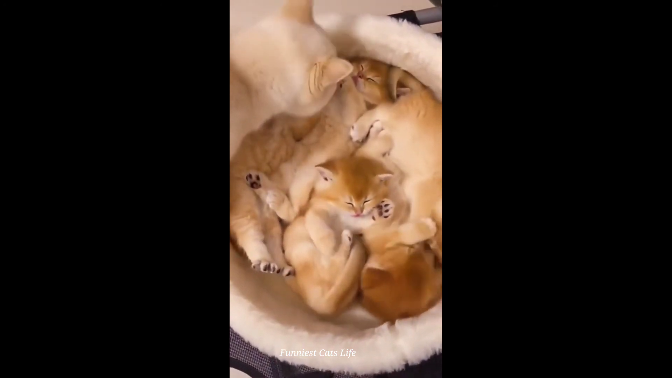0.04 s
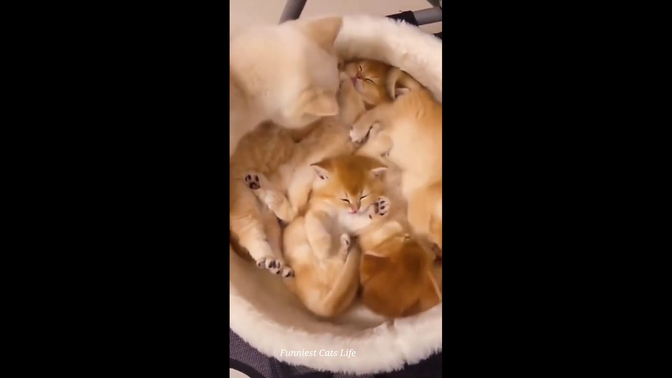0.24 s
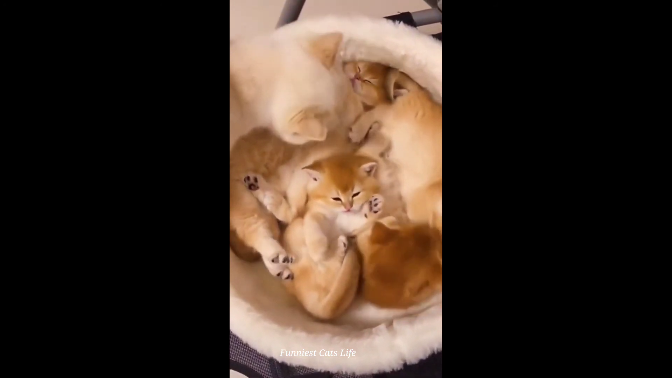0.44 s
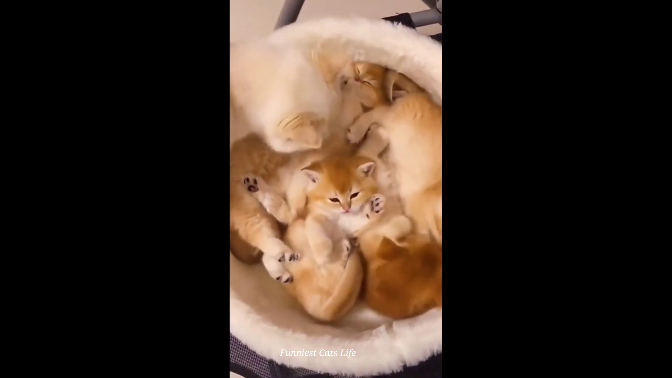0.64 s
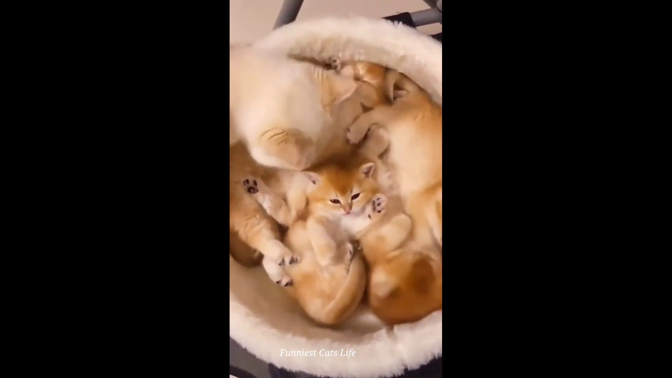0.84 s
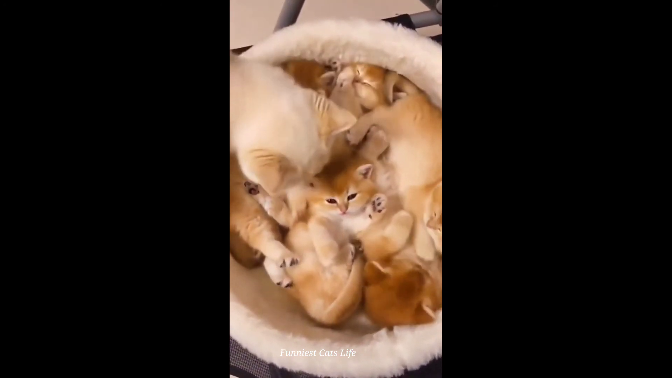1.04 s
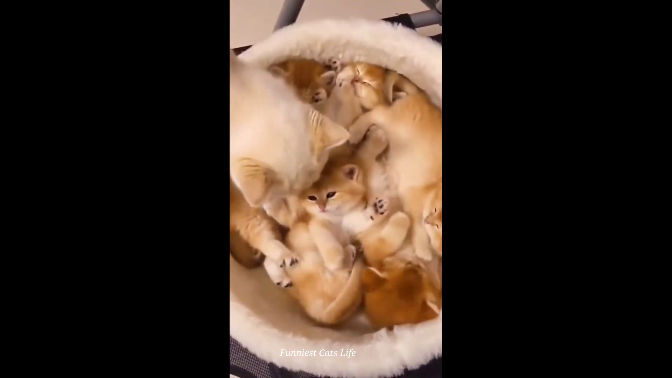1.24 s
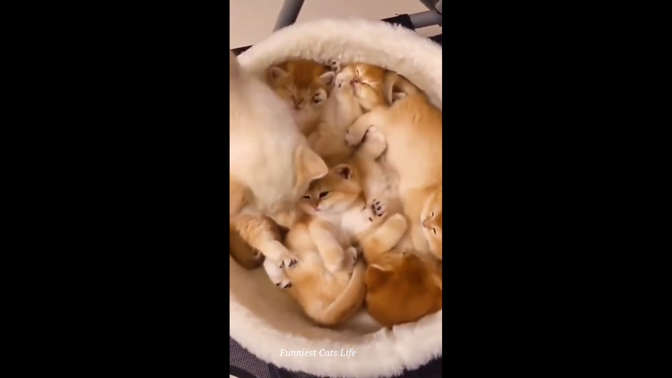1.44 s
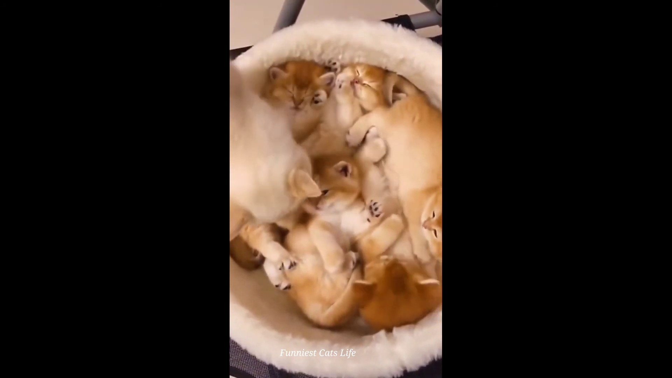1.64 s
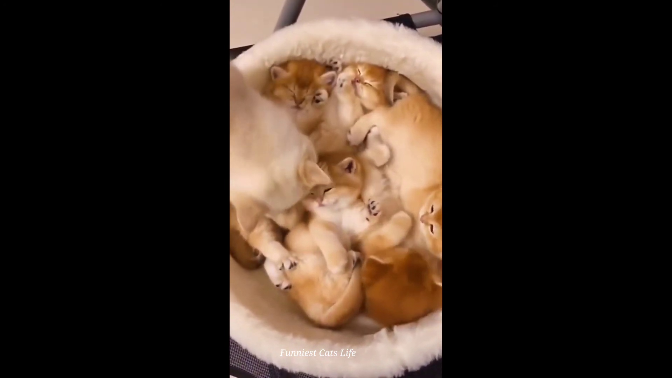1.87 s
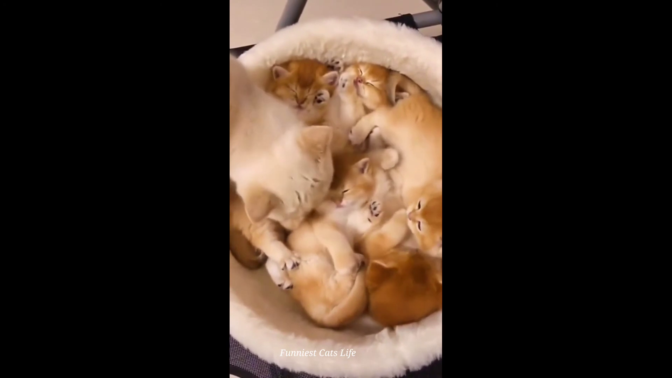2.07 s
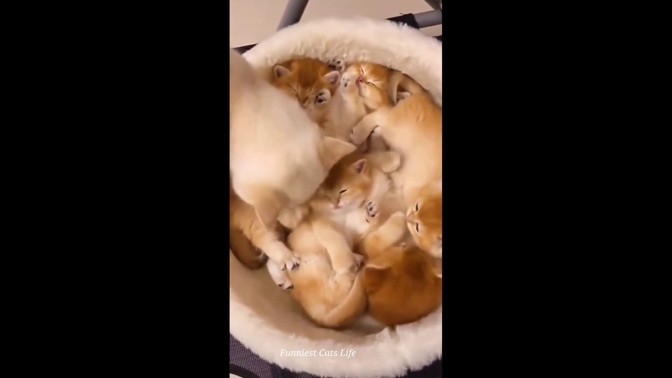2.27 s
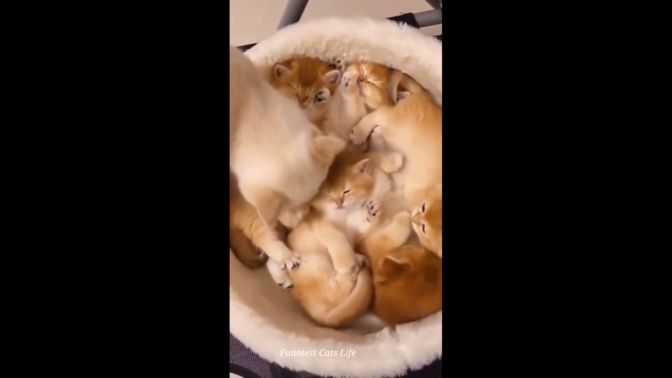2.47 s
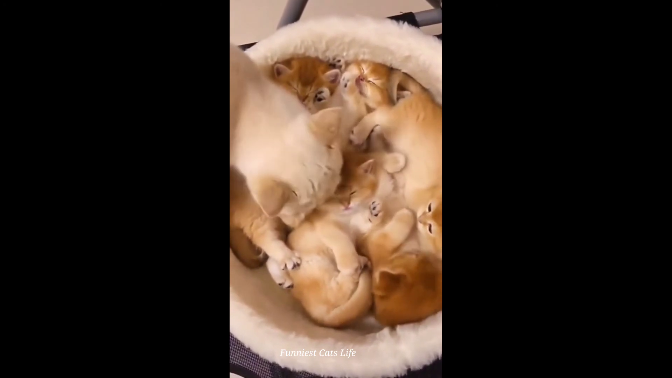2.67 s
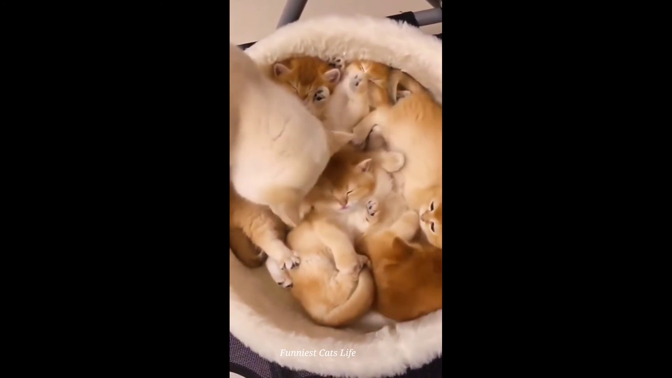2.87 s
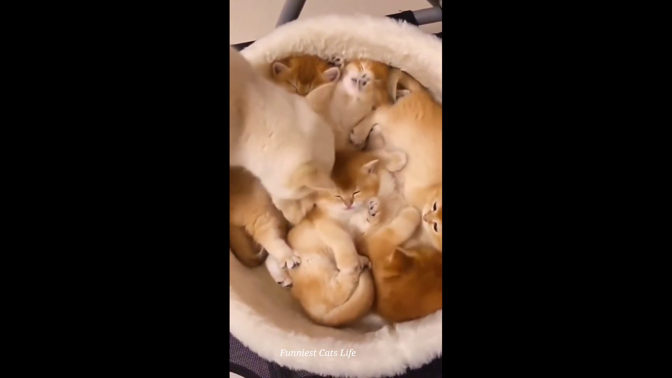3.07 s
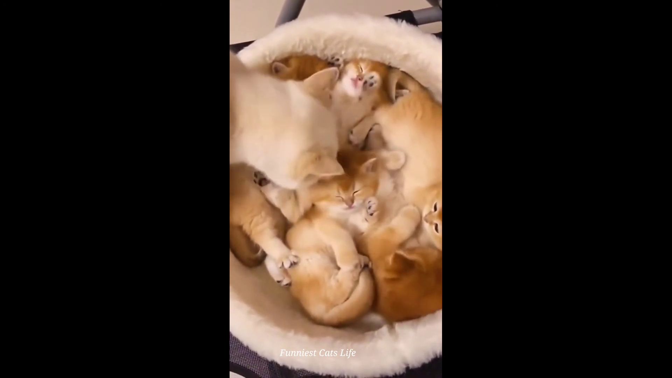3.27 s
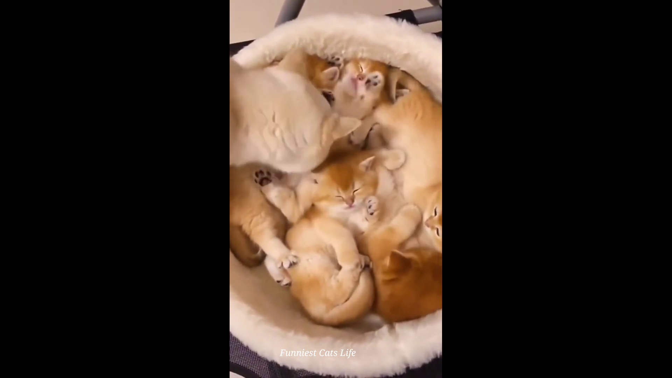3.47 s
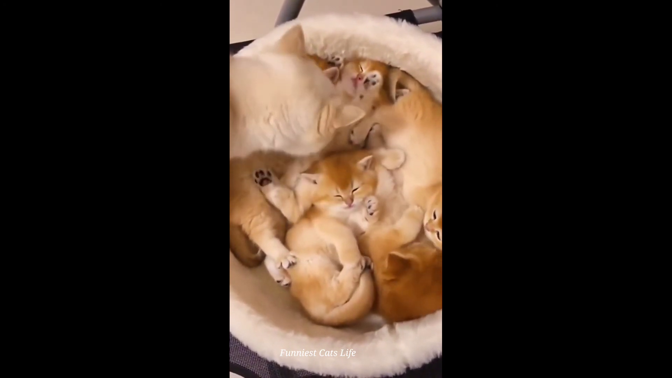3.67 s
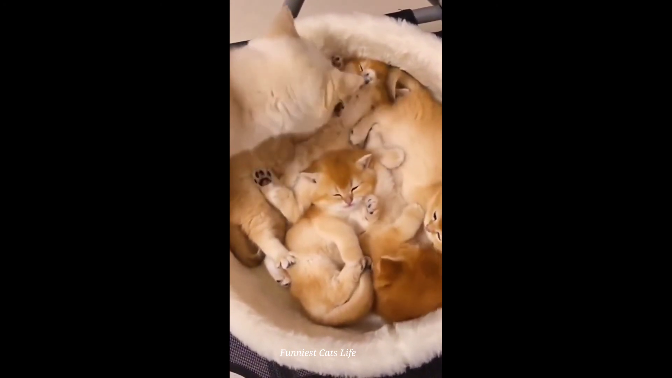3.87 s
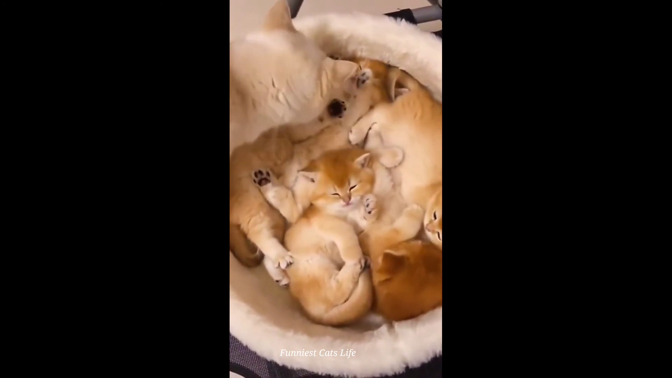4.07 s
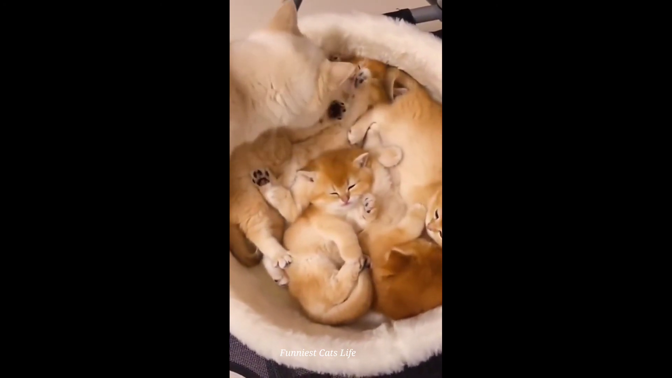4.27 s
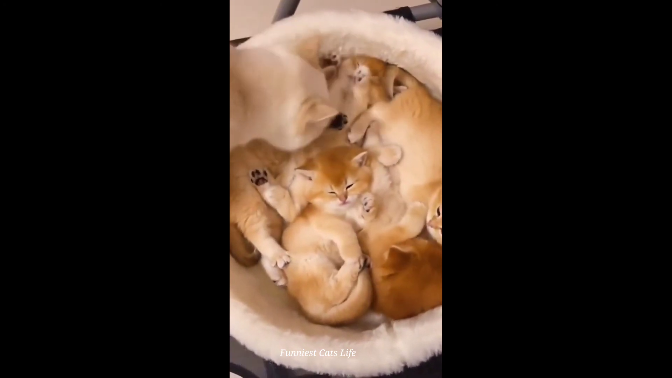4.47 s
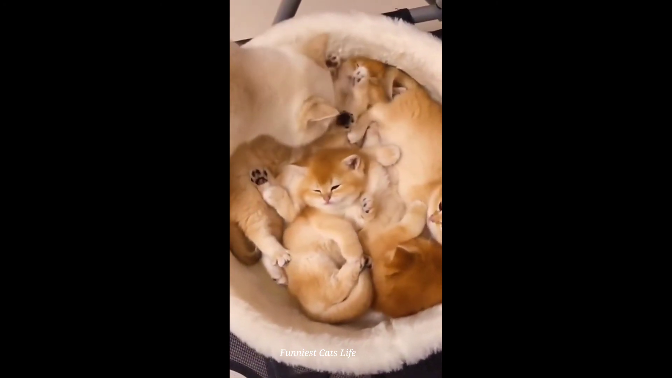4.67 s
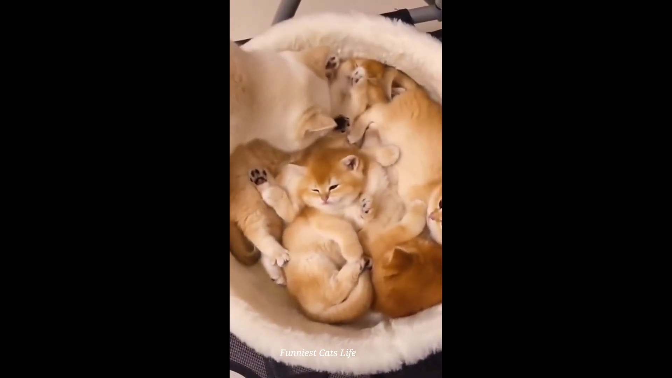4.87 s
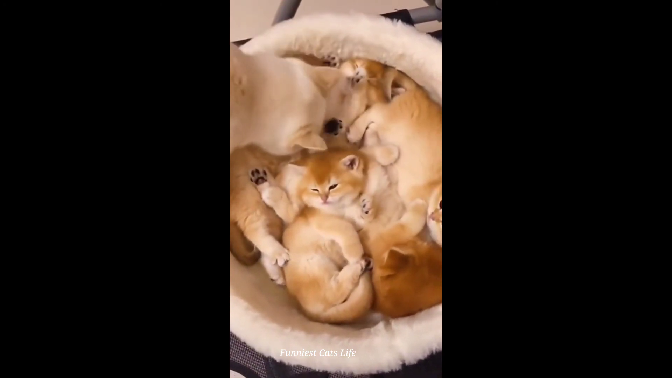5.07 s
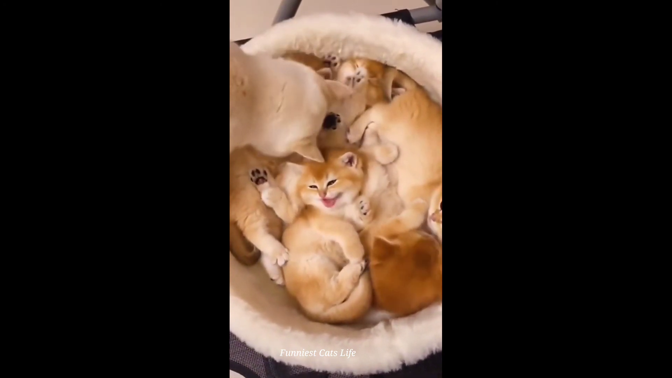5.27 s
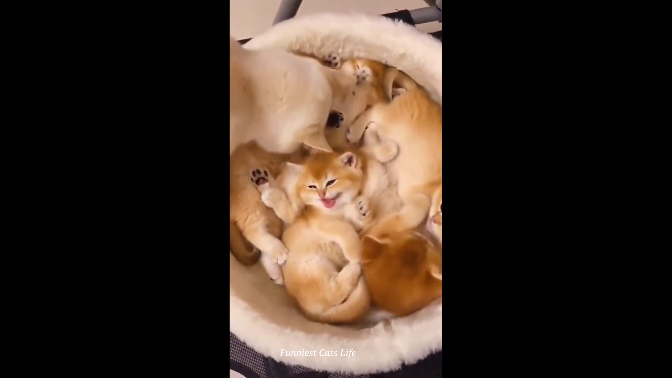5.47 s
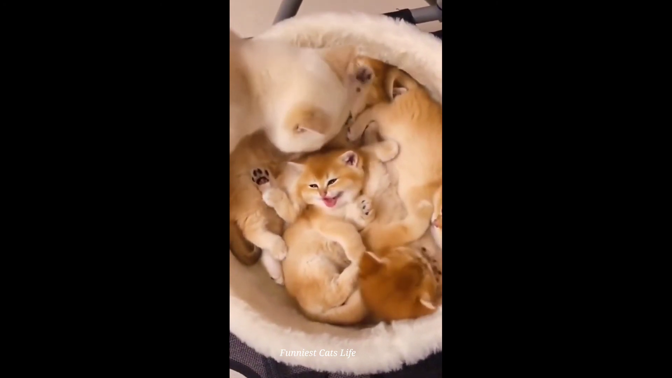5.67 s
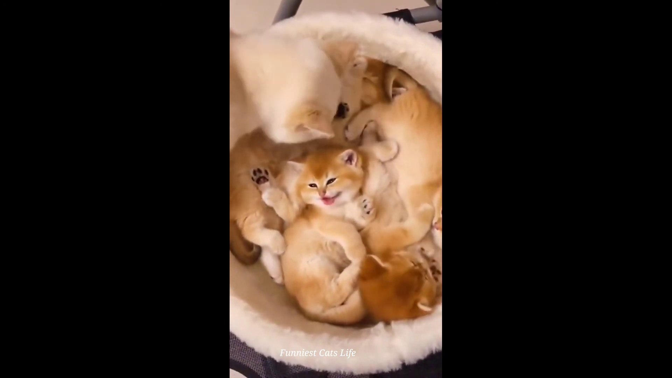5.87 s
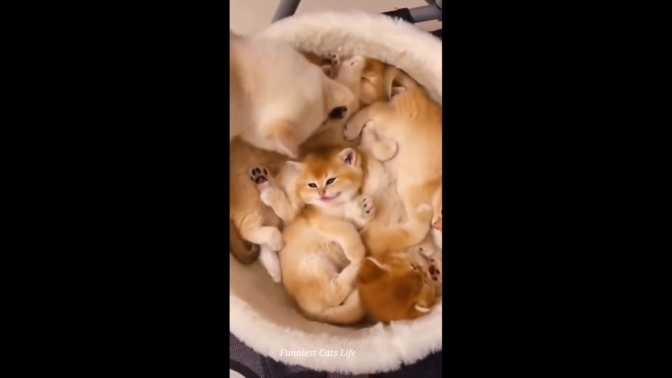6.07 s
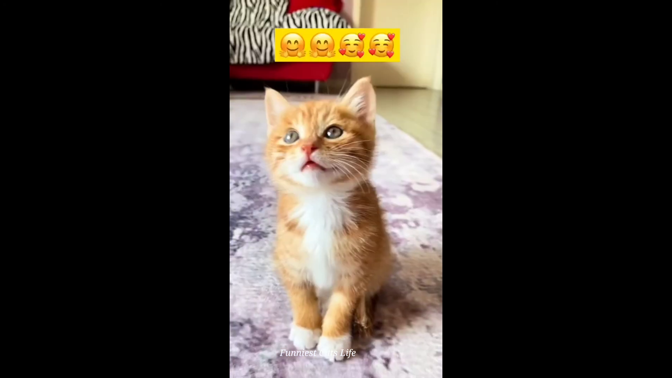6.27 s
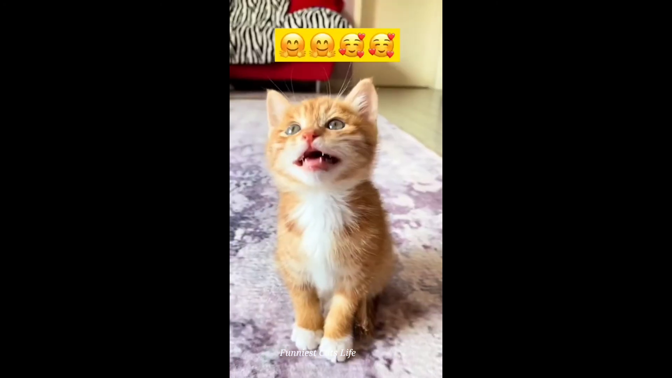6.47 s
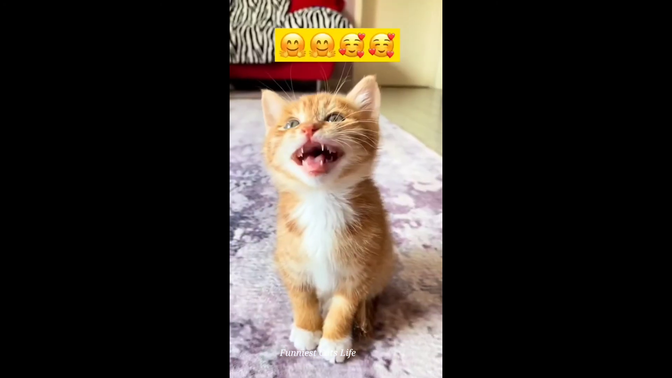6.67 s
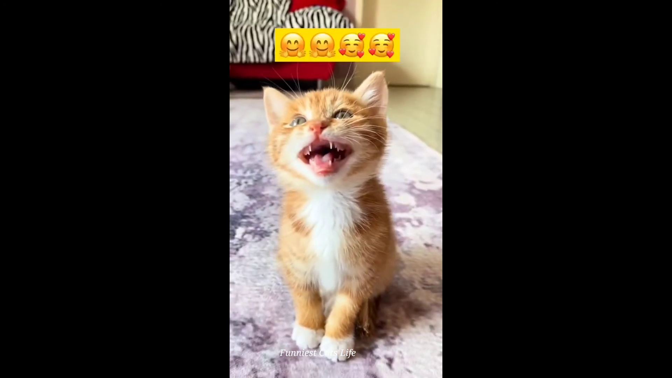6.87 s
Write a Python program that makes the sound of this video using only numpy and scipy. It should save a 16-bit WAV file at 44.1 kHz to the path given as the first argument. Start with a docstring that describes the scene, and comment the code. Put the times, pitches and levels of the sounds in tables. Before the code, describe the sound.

Faint mouth ticks open the scene over low room noise, then a cat mews quietly five times in a basket of kittens. Brief licks, light rustling of bedding and a few dull bumps on the basket fall among the calls, with a little room echo. After a dip to near silence, a single kitten meows right by the microphone, much louder and higher, breathy and just distorting.

```python
"""Cat and kittens in a basket

A cat among her kittens gives five quiet mews in a furnished room, each a harmonic series filtered by
her mouth. Mouths tick, pop and lick, the soft basket rings to dull taps and fur rustles the bedding.
The sound fades to near silence, then fades in on one kitten close by, whose long, loud, breathy meow
just overloads the input."""
import sys
import numpy as np
from scipy import signal
from scipy.fft import rfft, irfft, next_fast_len
from scipy.io import wavfile

SR = 44100
rng = np.random.default_rng(int(sys.argv[2]) if len(sys.argv) > 2 else 0)


def waveform_to_disk(signal):
    """Save audio, clipped to [-1, 1], as 16-bit WAV at the path in sys.argv[1]."""
    frames = np.transpose(np.atleast_2d(signal))
    scaled = np.clip(frames, -1, 1) * 32767
    samples = np.round(scaled).astype(np.int16)
    wavfile.write(sys.argv[1], SR, samples)


N = 305611


def amp(db):
    """Amplitude ratio: a factor of ten for every 20 dB."""
    return 10 ** (np.asarray(db) / 20)


def rms_one(x):
    """Normalisation to unit mean power."""
    return x / np.sqrt(np.mean(x ** 2) + 1e-20)


def span(rows):
    """Linear interpolation in time: the samples a table covers, and its columns at each."""
    times, *columns = np.transpose(rows)
    at = np.arange(int(times[0] * SR), min(int(times[-1] * SR) + 1, N))
    return at, [np.interp(at / SR, times, c) for c in columns]


def at_hz(points, hz):
    """Interpolation of a spectral envelope over log frequency."""
    knots_hz, db = np.transpose(points)
    return np.interp(np.log(hz), np.log(knots_hz), db)


def blend(knots_hz, colours, shares, hz):
    """Weighted mean of spectral envelopes, in dB, at the frequencies hz."""
    return sum(share * np.interp(np.log(hz), np.log(knots_hz), c) for c, share in zip(colours, shares))


def drift(rate_hz, size):
    """Random modulation: noise through a two-pole low-pass, rms 1."""
    pole = np.exp(-2 * np.pi * rate_hz / SR)
    slow = signal.lfilter([1], [1, -2 * pole, pole * pole], rng.standard_normal(size + 4000))
    return rms_one(slow[4000:])


def coloured(spectrum, size=N):
    """Spectral shaping of white noise, band-limited to the envelope's ends; rms 1."""
    hz = np.maximum(np.arange(size // 2 + 1) * SR / size, 1)
    inside = (hz > spectrum[0][0]) & (hz < spectrum[-1][0])
    return rms_one(irfft(rfft(rng.standard_normal(size)) * amp(at_hz(spectrum, hz)) * inside, size))


def edges(size, ramp_s):
    """Trapezoidal window: a gradual onset and end avoid clicks."""
    i = np.arange(size)
    return np.clip(np.minimum(i, size - i) / (ramp_s * SR), 0, 1)


def partial(phase, k, shimmer_db):
    """Harmonic k with shimmer, a random modulation of its amplitude."""
    shimmer = amp(shimmer_db * drift(38.3, len(phase)))
    return np.sqrt(2) * shimmer * np.sin(k * phase + rng.uniform(0, 2 * np.pi))


def clicks(events, half_octaves, decay_s):
    """Damped transients: exponentially decaying noise, band-passed about each event's centre."""
    out, t = np.zeros(N), np.arange(8000) / SR
    for (s, db, hz), noise in zip(events, rng.standard_normal((len(events), len(t)))):
        band_hz = np.clip(hz * 2. ** np.array([-half_octaves, half_octaves]), 100, .45 * SR)
        band_pass = signal.butter(2, band_hz, "band", fs=SR, output="sos")
        burst = signal.sosfilt(band_pass, noise * np.exp(-t / decay_s))
        out[round(s * SR):][:len(t)] += amp(db) * burst / np.abs(burst).max()
    return out


def room_air(level_db=-62):
    """Ambient noise: broadband, strongest in the bass, wavering slightly in level."""
    # noise spectrum: (frequency [Hz], relative density [dB])
    spectrum = [(15, -62), (25, -4.5), (101, -1.5), (297, -10), (368, -7.5), (552, -13), (741, -16.5),
                (1140, -17), (1450, -19.5), (3930, -26.5), (8130, -29.5), (10100, -30), (15500, -34)]
    return amp(level_db + 0.69 * drift(3, N)) * coloured(spectrum)


def mouth_ticks(faint_count=8):
    """Brief impulses have broad spectra: clear ticks of the mouths, and faint ones at random."""
    # clear ticks: (time [s], peak level [dB], centre frequency [Hz])
    clear = [(.2695, -44, 9000), (.3144, -54, 4450), (.336, -46, 8000), (.3453, -42, 4800),
             (.4414, -57, 6580), (.649, -48, 5340), (.967, -52, 3250), (1.3864, -46, 3900),
             (1.801, -47.5, 5850), (2.383, -50, 4970), (2.6187, -45, 7800), (2.6259, -38.5, 6200),
             (2.6815, -53, 8080), (5.2007, -47, 6650), (5.497, -48, 6940), (5.751, -51, 6160),
             (5.8267, -45.5, 9600), (5.848, -49, 5600)]
    faint = [(6 * a, -58 + 4 * b, 3500 + 6000 * c) for a, b, c in rng.random((faint_count, 3))]
    return clicks(list(clear) + faint, half_octaves=0.62, decay_s=.002)


def mews(trill_hz=45, formant_width_hz=380, vowel_hz=(1600, 3500, 6500)):
    """Source and filter: low harmonics hum through the nose, higher ones emerge as the mouth opens."""
    # contour of each mew: (time [s], pitch [Hz], level [dB], mouth opening [0-1])
    contours = [
        [(0.93, 502, -80, 0.02), (0.938, 494, -43.5, 0.07), (0.974, 406.7, -42.5, 0.32),
         (1.045, 418.7, -41.5, 0.84), (1.069, 437.7, -40.5, 0.85), (1.183, 476.3, -42, 0.97),
         (1.281, 489.5, -41, 0.94), (1.321, 466.5, -44, 0.94), (1.365, 491.5, -45, 0), (1.385, 493, -46, 0.55)],
        [(2.092, 692, -51, .02), (2.112, 690, -47.5, 0.2), (2.14, 559, -39.5, 0.54),
         (2.182, 544.7, -42.5, 0.63), (2.25, 575.3, -45.5, .7), (2.306, 565.5, -44.5, 0.65),
         (2.406, 545.8, -42, 0.32), (2.556, 564.8, -41.5, 0.36), (2.636, 543, -41.5, 0.35),
         (2.736, 522.4, -39.5, 0.37), (2.744, 550.3, -37, 0.64), (2.8, 564, -49, 0.95),
         (2.858, 544, -40.5, 0.64), (2.96, 529.6, -39.5, 0.33), (2.986, 502, -42, 0.41)],
        [(3.494, 583, -44.5, 0.13), (3.516, 450.4, -46, 0.39), (3.538, 421.8, -43, 0.39),
         (3.585, 426.3, -46.5, 0.6), (3.593, 439, -37.5, 0.75), (3.687, 466.7, -45, 0.9),
         (3.727, 487, -41.5, 0.82), (3.849, 495.9, -41, 0.85), (3.879, 483, -46, 1), (3.901, 455.3, -41, 0.81),
         (3.93, 459.6, -44.5, 0.22)],
        [(4.649, 551, -45, 0.14), (4.699, 433, -46.5, 0.41), (4.783, 410.5, -43.5, 0.41),
         (4.843, 466, -49.5, 0.27), (4.873, 494.6, -49, 0.24), (4.947, 488, -52.5, 0.34), (4.99, 511, -45, 0.1)],
        [(5.625, 476, -46, 0.13), (5.665, 399.5, -43.5, 0.3), (5.739, 414.3, -41.5, 0.42),
         (5.765, 405, -40.5, 0.59), (5.915, 423.6, -41.5, 0.57), (5.979, 442, -44.5, 0.46),
         (6.045, 417, -37, 0.37), (6.171, 425.5, -50, 0.39), (6.2, 420, -56, 0.7)],
    ]
    # trill depth of each mew: (pitch swing [fraction of the pitch])
    trills = [.006, .004, .006, .018, .045]
    # vocal tract response: (frequency [Hz], mouth shut [dB], half open [dB], wide open [dB])
    tract = [(440, 6, 1.5, -1.5), (570, -5.5, -4.5, -14.5), (866, -27, -4, 0.5), (1025, -16, 0, -6.5),
             (1300, -35, -5.5, -16), (1834, -48, -16, -9.5), (2040, -48, -35.5, -5), (2450, -50, -40, -5),
             (2900, -63, -39, -12.5), (3700, -45, -43, -10), (4440, -45, -38, -23.5), (5130, -60, -43, -34),
             (6050, -60, -50, -20.5), (7650, -60, -53, -27.5), (9000, -70, -68, -46)]
    # sliding mouth resonance of each mew: (time [s], frequency [Hz], lift [dB])
    formants = [
        [(.97, 2900, 27), (1.06, 2950, 8.5), (1.12, 2330, 10.5), (1.28, 2450, 5), (1.36, 2400, -15)],
        [(2.14, 2700, 13), (2.26, 3280, 12), (2.4, 3400, 0), (2.62, 3500, 4), (2.72, 3285, 26), (2.75, 2730, 8),
         (2.86, 2480, -2)],
        [(3.53, 1300, -5), (3.6, 1800, 8.5), (3.7, 2400, 10.5), (3.9, 2400, -3)],
        [(4.68, 2300, 21), (4.78, 2430, 12), (4.84, 1500, 9)],
        [(5.7, 1240, 3.5), (5.78, 2620, 12), (5.86, 2600, -3)],
    ]
    # vowel of each mew, as lifts at vowel_hz: (low [dB], middle [dB], treble [dB])
    vowels = [(-6.5, 0.5, -0.6), (1.5, -0.5, -11), (-2.3, -8, 3), (0, 5, -8), (0.5, -4.5, 2)]
    out = np.zeros(N)
    knots_hz, *colours = np.transpose(tract)
    for contour, depth, formant, vowel in zip(contours, trills, formants, vowels):
        at, (pitch, db, opening) = span(contour)
        trill_rate = trill_hz * (1 + .18 * drift(8, len(at)))
        trill = depth * np.sin(2 * np.pi * np.cumsum(trill_rate) / SR)
        jitter = 0.0025 * drift(70, len(at))
        phase = 2 * np.pi * np.cumsum(pitch * (1 + trill + jitter)) / SR
        shares = [np.clip(1 - np.abs(2 * np.clip(opening, 0, 1) - k), 0, 1) for k in range(3)]
        times, *track = np.transpose(formant)
        formant_hz, lift_db = [np.interp(at / SR, times, c) for c in track]
        gains = []
        for hz in np.outer(range(1, 22), pitch):
            formant_db = lift_db * np.exp(-((hz - formant_hz) / formant_width_hz) ** 2)
            vowel_db = at_hz([(1000, 0), *zip(vowel_hz, vowel)], hz)
            gains.append(amp(blend(knots_hz, colours, shares, hz) + formant_db + vowel_db))
        voice = sum(g * partial(phase, k + 1, shimmer_db=1 + .26 * k) for k, g in enumerate(gains))
        voice /= np.sqrt(sum(g ** 2 for g in gains))
        tremolo = 1 + 4.3 * trill   # the level follows the pitch swing
        out[at] += amp(db) * voice * tremolo * edges(len(at), 0.0029)
    return out


def room(x, t60_s=0.83, wall_cut_hz=1520):
    """Reverberation alone: sixteen feedback delays, dulled by wall absorption on every round trip."""
    size = next_fast_len(N + SR)
    omega = 2 * np.pi * np.arange(size // 2 + 1) / size
    wall_gain = 1 / (1 + (omega * SR / (2 * np.pi * wall_cut_hz)) ** 2) ** .1
    response = 0
    for k, lag_s in enumerate(rng.uniform(.015, .06, 16)):
        trip = amp(-60 * lag_s / t60_s) * wall_gain * np.exp(-1j * omega * round(lag_s * SR))
        response = response + (-1) ** k * trip / (1 - trip)
    return irfft(rfft(x, size) * response, size)[:N]


def pops_and_taps(basket_hz=(1040, 2950)):
    """Damped resonance: lips pop as they part or shut, and each tap excites two basket modes."""
    # lip pops: (time [s], peak level [dB], centre frequency [Hz])
    pops = [(1.352, -41, 470), (2.972, -42.5, 526), (3.592, -57, 900), (3.915, -45.5, 1000)]
    # taps on the basket: (time [s], low mode peak [dB], high mode peak [dB])
    taps = [(2.456, -68, -60), (4.08, -70, -59), (4.511, -36.5, -41), (4.542, -44, -58),
            (4.974, -42, -50.5)]
    rings = [(s, db, hz) for s, *levels in taps for db, hz in zip(levels, basket_hz)]
    return clicks(rings + list(pops), half_octaves=0.28, decay_s=0.0051)


def licks(trail_db=-8.5):
    """Two-stage decay: a short wet smack, and a narrower band of hiss that trails off."""
    # smacks: (time [s], peak level [dB], centre frequency [Hz])
    events = [(1.81, -48, 3900), (1.928, -51, 3200), (2.015, -44, 2700)]
    smacks = clicks(events, half_octaves=0.39, decay_s=0.0046)
    return smacks + amp(trail_db) * clicks(events, half_octaves=0.13, decay_s=0.079)


def rustle(fade_db=17):
    """Friction noise: fur drags over the bedding in uneven grains, swelling and fading."""
    # strokes of fur: (start [s], peak time [s], end [s], peak level [dB])
    strokes = [(1.903, 2.07, 2.2, -60.5), (4.498, 4.52, 4.68, -55), (5.299, 5.444, 5.62, -62.5)]
    # friction spectrum: (frequency [Hz], relative density [dB])
    bedding = [(290, -15), (500, -8), (644, -34), (1140, -3), (5780, -22.5), (7050, -25.5), (12000, -34),
               (15600, -60), (22000, -120)]
    out = np.zeros(N)
    for start, peak, end, top_db in strokes:
        at, (db,) = span([(start, top_db - fade_db), (peak, top_db), (end, top_db - fade_db)])
        grain_db = 2.0 * drift(37, len(at))
        out[at] = amp(db + grain_db) * coloured(bedding, len(at)) * edges(len(at), 0.014)
    return out


def kitten_meow(breath_db=-50, haze_db=-33):
    """Source and filter: sharp harmonics, strongest on the throat resonance, with breath between them."""
    # contour: (time [s], base level [dB], mouth shape [0-1], harmonic 2 lift [dB], treble lift [dB])
    contour = [(6.367, -44.5, .02, -17, -58), (6.384, -26, .02, -10, -42), (6.426, -14, 0.022, -8, -56),
               (6.455, -9, .02, -1.5, -24), (6.468, -9, 0.018, -8.5, 1.3), (6.552, -8, 0.075, 1.5, 2),
               (6.575, -7, 0.49, -5, 5.5), (6.654, -7.5, 0.91, -11, 4), (6.686, -7.5, 0.92, -22, 0),
               (6.71, -6, .7, -9.5, -4), (6.738, -8, .98, -2, -1), (6.78, -9, .98, -1.5, 1.5),
               (6.8, -8.5, 1, -4.5, -1), (6.868, -7.5, 0.92, -4, 2), (6.9, -9.5, .98, -15, 4),
               (6.93, -9, 0.7, -6, 1)]
    # fundamental: (time [s], frequency [Hz])
    melody = [(6.36, 892.8), (6.488, 899.8), (6.522, 911.1), (6.624, 922.3), (6.7, 924.1), (6.782, 902.2),
              (6.918, 888.4), (6.93, 881.1)]
    # vocal tract response: (frequency [Hz], gain at shape 0 [dB], gain at shape 1 [dB])
    tract = [(913, -12.5, -12), (1800, -8.5, -5), (2700, -10, -11.5), (3635, -1.5, 0), (4500, -5, -24.5),
             (5400, -25, -17.5), (6267, -16.5, -20), (7180, -28, -45.5), (7950, -56, -62),
             (9153, -25.5, -21.5), (10120, -29, -40), (10900, -33.5, -46.5), (12530, -48, -21.5),
             (12300, -43, -43), (13700, -70, -70), (15400, -80, -79)]
    # high haze of breath: (frequency [Hz], relative density [dB])
    haze_spectrum = [(8800, -13), (9500, 7), (10500, -16), (12000, 1), (12700, -3)]
    # broadband breath: (frequency [Hz], relative density [dB])
    breath_spectrum = [(800, -45), (1500, -8.5), (2900, -24), (3500, 3.5), (4300, 2.5), (5000, -30),
                       (6200, -4), (8000, -31), (9500, -33), (11000, -34)]
    # puffs of breath: (time [s], level [dB], half length [s])
    puffs = [(6.433, -35.5, 0.039), (6.534, -37, 0.018), (6.699, -26, 0.023)]
    knots_hz, *colours = np.transpose(tract)
    at, (db, shape, second_db, treble_db) = span(contour)
    t, size = at / SR, len(at)
    pitch = np.interp(t, *np.transpose(melody))
    jitter = 0.0022 * drift(35.6, size)
    phase = 2 * np.pi * np.cumsum(pitch * (1 + jitter)) / SR
    shape, voice = np.clip(shape, 0, 1), 0
    for k in range(1, 18):
        tract_db = blend(knots_hz, colours, [1 - shape, shape], k * pitch.mean())
        level_db = db + tract_db + second_db * (k == 2) + treble_db * (k > 8)
        voice += amp(level_db) * partial(phase, k, shimmer_db=4.1 if k > 7 else 0.5)
    voice += amp(db + treble_db + haze_db) * coloured(haze_spectrum, size)
    puffing = sum(amp(top_db) * np.exp(-((t - s) / half_s) ** 2) for s, top_db, half_s in puffs)
    flutter = amp(3.6 * drift(16, size))
    breath = (amp(db + breath_db) + puffing) * flutter * coloured(breath_spectrum, size)
    onset = edges(2 * size, 0.0032)[:size]
    out = np.zeros(N)
    out[at] = voice * onset + breath
    return out


def near_air(level_db=-46):
    """Ambient noise around the kitten: a low rumble under random amplitude modulation."""
    # rumble spectrum: (frequency [Hz], relative density [dB])
    spectrum = [(15, -26), (25, -9), (65, 2), (214, -6.5), (395, -9.5), (511, -12.5), (750, -10),
                (980, -56), (1650, -120)]
    return amp(level_db + 2.5 * drift(12, N)) * coloured(spectrum)


def scene(room_db=-21, near_room_db=-20, hiss_db=-93):
    """Superposition of direct sound, reverberation and air: first the basket, then the close kitten."""
    t = np.arange(N) / SR
    fade_out = np.interp(t, (6.14, 6.205), [1, 0])
    fade_in = np.interp(t, (6.365, 6.46), [0, 1])
    basket = mews() + pops_and_taps() + rustle()
    air = room_air()
    far = basket + amp(room_db) * room(basket) + mouth_ticks() + licks() + air
    kitten = kitten_meow()
    # the room returns little of the kitten's fundamental
    overtones = signal.sosfilt(signal.butter(4, 1300, "high", fs=SR, output="sos"), kitten)
    near = kitten + amp(near_room_db) * room(overtones) + near_air() * fade_in
    hiss = amp(hiss_db) * rng.standard_normal(N)
    return (far * fade_out + near + hiss)[None]


def record(dry, cutoff_hz=15700):
    """Overload and band limiting: the loudest peaks clip, then a steep low-pass cuts the top."""
    low_pass = signal.cheby2(14, 80, cutoff_hz, fs=SR, output="sos")
    return signal.sosfilt(low_pass, np.clip(dry, -1, 1))


dry = scene()
out = record(dry)
waveform_to_disk(out)
```